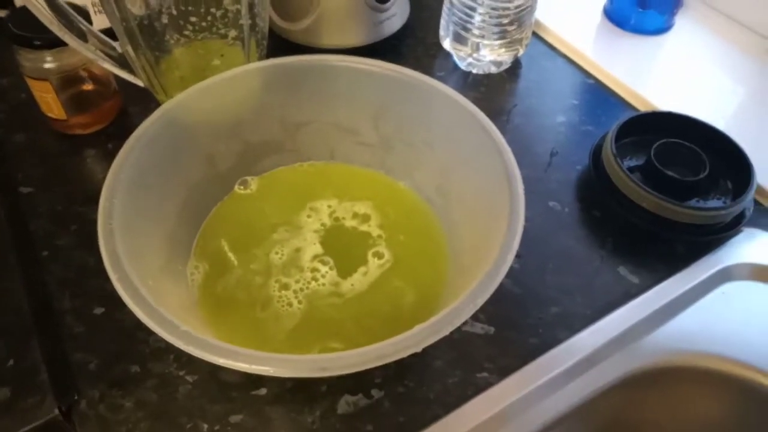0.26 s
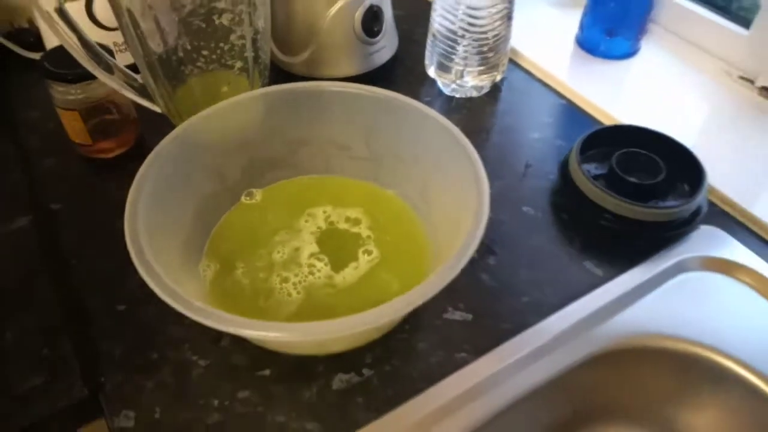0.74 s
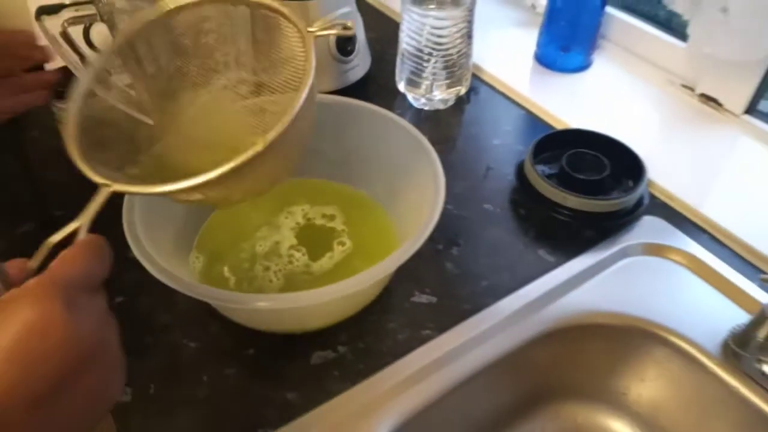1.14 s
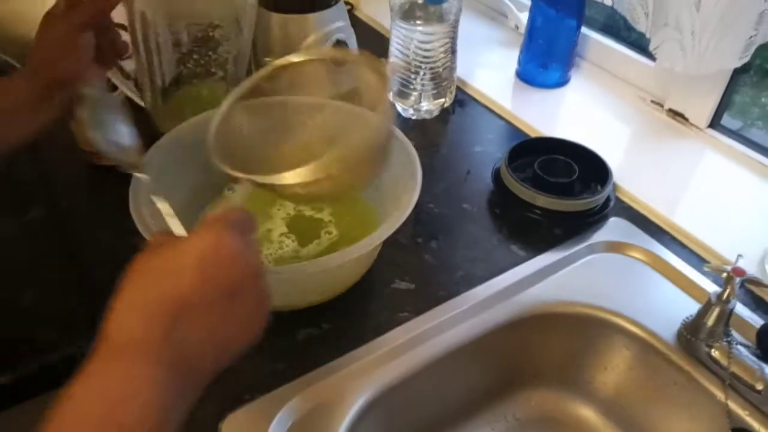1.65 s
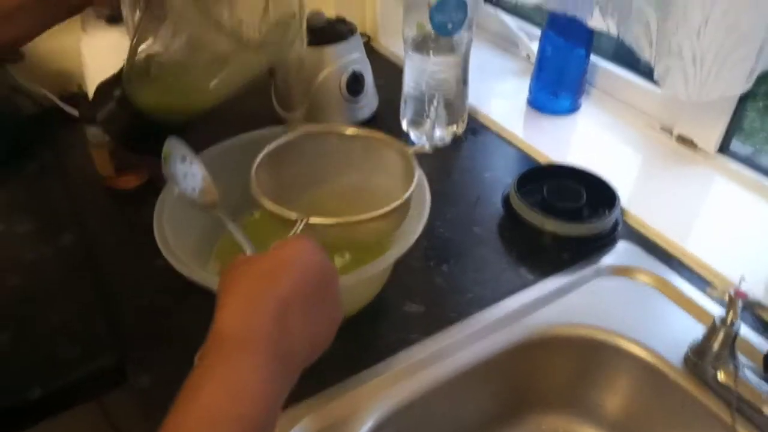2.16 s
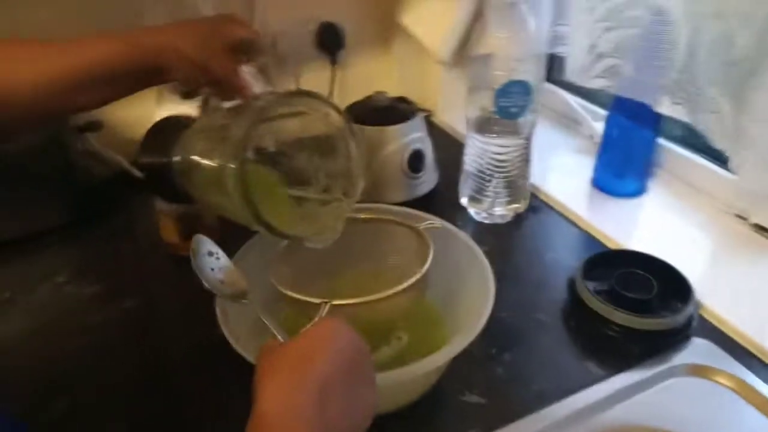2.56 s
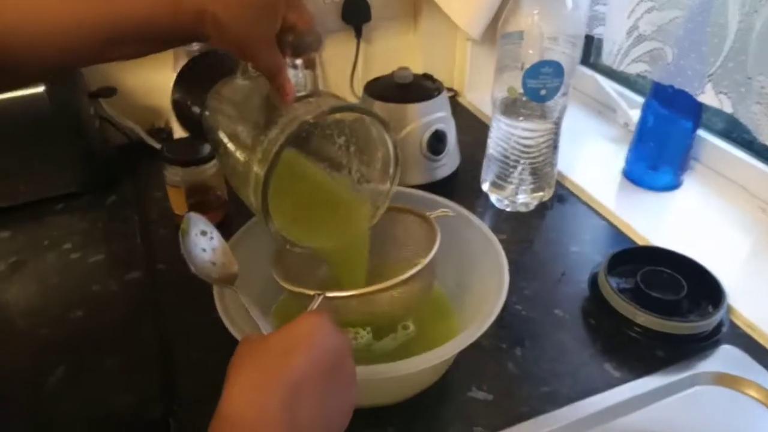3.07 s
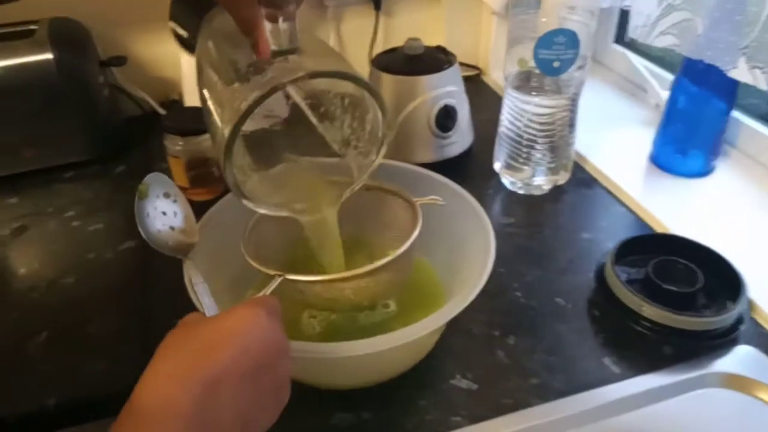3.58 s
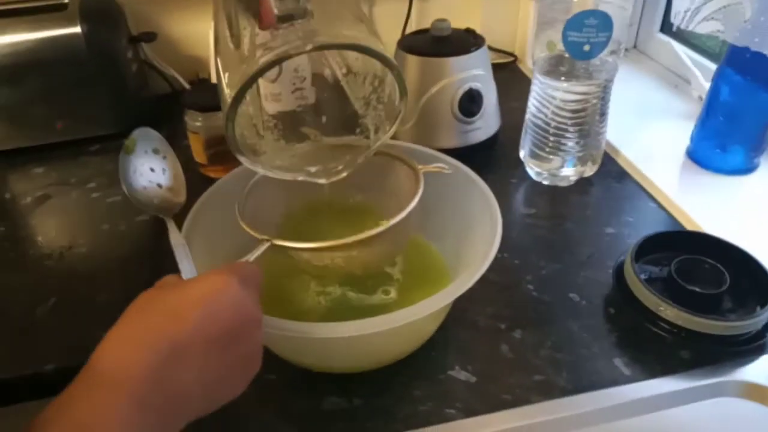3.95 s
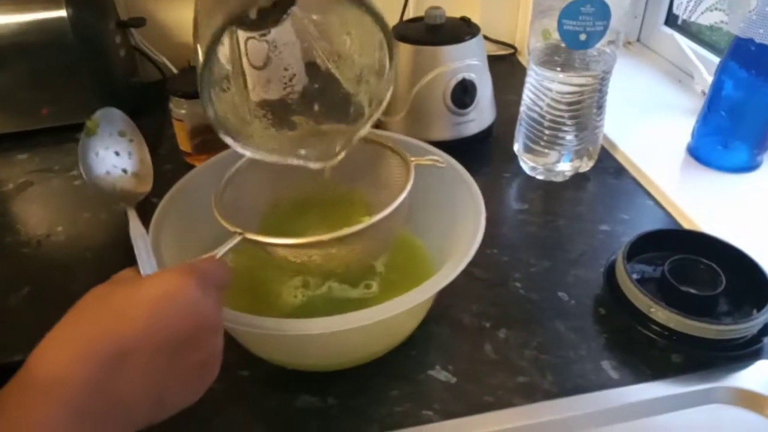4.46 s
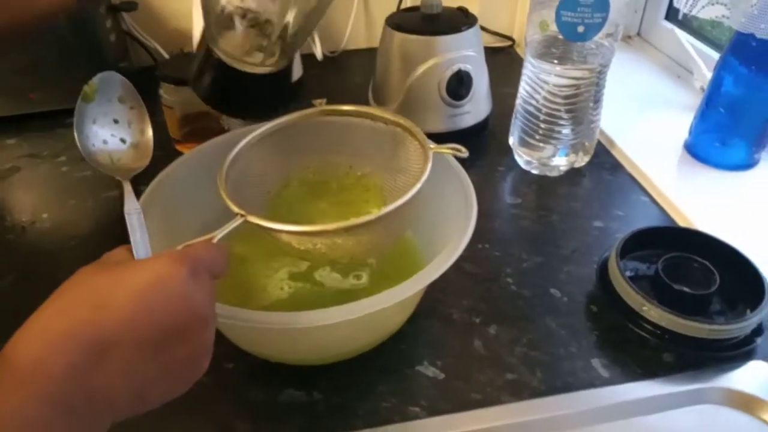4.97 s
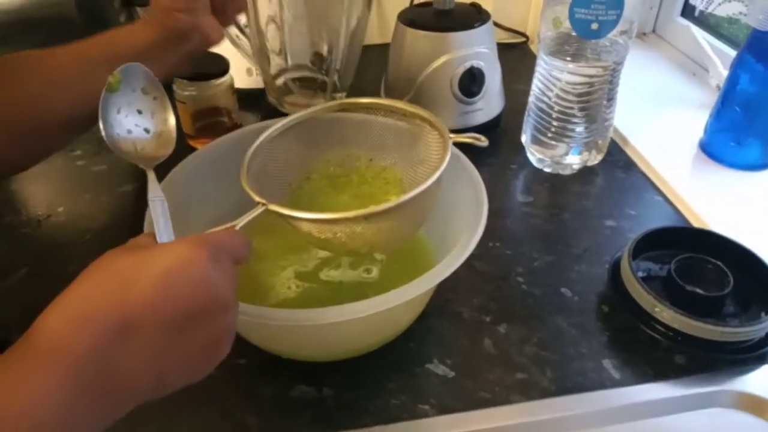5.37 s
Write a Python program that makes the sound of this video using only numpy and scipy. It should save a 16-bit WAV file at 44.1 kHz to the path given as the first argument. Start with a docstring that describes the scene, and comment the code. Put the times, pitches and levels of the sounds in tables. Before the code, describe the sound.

A faint, low fridge hum runs throughout in a small kitchen, with the action close by. At about 0.1 seconds a metal spoon and wire sieve are picked up with a bright tick and a brief wiry brush. More light taps and thin rubbing against a plastic bowl follow from 0.9 to 1.5 seconds. Around 1.6 seconds a blender jug judders briefly across the worktop, then rocks from 1.85 to 2.1 seconds with a quick run of ringing thuds, the loudest sounds here. It clinks once at 2.6 seconds as it is lifted. From about 3.2 to 3.8 seconds thick juice glugs into the sieve in surges, with bubbly plips, spattering droplets and tiny snaps of foam. The pour then thins to quiet, scattered drips through the mesh into the bowl until about 5 seconds, leaving little but the hum.

```python
"""Light taps and wiry brushing open the scene: a sieve and a spoon are picked up over a plastic bowl.
A blender jug judders across the worktop, rocks with ringing thuds and is lifted with a clink.
Thick juice glugs from it into the sieve, trapped air ringing as bubbles, droplets spattering and
foam snapping, then drips through the mesh into the bowl. A fridge hums throughout in the small kitchen."""
import sys
import numpy as np
from scipy import signal
from scipy.fft import rfft, irfft
from scipy.io import wavfile

SR = 44100
rng = np.random.default_rng(int(sys.argv[2]) if len(sys.argv) > 2 else 0)


def write(x):
    x = np.atleast_2d(x).T
    wavfile.write(sys.argv[1], SR, np.round(np.clip(x, -1, 1) * 32767).astype(np.int16))


N = 247842
TIME = np.arange(N) / SR

# the largest air pockets trapped by the pour and the drips: start_s, pitch_hz, level_db
LARGE_POCKETS = [(3.177, 1067, -50), (3.217, 2500, -50.5), (3.248, 1803, -50.5), (3.287, 2450, -48.5),
                 (3.306, 840, -59), (3.323, 6550, -30.5), (3.324, 2864, -38), (3.36, 2357, -34),
                 (3.374, 1804, -38.5), (3.397, 2980, -37), (3.43, 1458, -38), (3.431, 2120, -42),
                 (3.447, 3700, -38.5), (3.464, 1238, -43), (3.538, 3435, -39), (3.561, 1510, -40),
                 (3.567, 2056, -43.5), (3.619, 2042, -39), (3.71, 4870, -42.5), (3.734, 3244, -42.5),
                 (3.764, 2700, -49), (3.772, 956, -60), (4.058, 1642, -55.5), (4.083, 2447, -53),
                 (4.09, 5380, -55), (4.144, 4180, -53.5), (4.26, 3180, -53.5), (4.537, 5400, -55),
                 (4.614, 5850, -58), (4.669, 2070, -57.5), (4.671, 4140, -48), (4.8, 4530, -48),
                 (4.8, 2910, -58), (4.828, 4480, -50), (4.851, 3450, -49.5), (4.883, 4450, -49),
                 (4.955, 4110, -45.5), (4.993, 5570, -52)]
POUR_START_S, BUBBLE_MID_HZ = LARGE_POCKETS[0][0], 2500
FULL_FLOW_DB, RATE_FOLLOWS = -54, 0.35   # event rates follow this share of the flow's swing in dB


def from_db(db):
    """Decibels to gain."""
    return 10 ** (np.asarray(db) / 20)


def rms_one(x):
    """Scale to rms 1."""
    return x / np.sqrt(np.mean(x ** 2) + 1e-20)


def at_hz(points, hz):
    """Read a curve on a log-frequency axis."""
    freqs, values = np.transpose(points)
    return np.interp(np.log(np.maximum(hz, 1)), np.log(freqs), values)


def coloured(x, curve):
    """Equalise with a smooth curve of freq_hz, gain_db."""
    gain = from_db(at_hz(curve, np.fft.rfftfreq(len(x), 1 / SR)))
    return irfft(rfft(x) * gain, len(x))


def high_pass(x, hz, order=4):
    """Roll off the lows below hz."""
    return signal.sosfilt(signal.butter(order, hz, "high", fs=SR, output="sos"), x)


def drift(per_s):
    """A random wander, gliding between normal draws."""
    knots = rng.standard_normal(int(TIME[-1] * per_s) + 2)
    return np.interp(TIME * per_s, np.arange(len(knots)), knots)


def dying(t, t60):
    """Exponential decay, 60 dB down at t60."""
    return np.exp(-np.log(1000) * t / t60)


def swell(crest_s, db, rise_s, fall_s):
    """A gain that climbs to db and fades again, by 60 dB in rise_s and in fall_s."""
    before, after = np.maximum(crest_s - TIME, 0), np.maximum(TIME - crest_s, 0)
    return from_db(db) * dying(before, rise_s) * dying(after, fall_s)


def add(out, s, sound):
    """Mix a sound in at time s."""
    i = min(int(s * SR), N)
    out[i:i + len(sound)] += sound[:N - i]


def click_track(hits):
    """One impulse for each start_s, level_db."""
    clicks = np.zeros(N)
    for s, db in hits:
        add(clicks, s, from_db([db]))
    return clicks


def ring(clicks, hz, t60):
    """Each click sets a damped sine ringing."""
    r, w = dying(1 / SR, t60), 2 * np.pi * hz / SR
    return signal.lfilter([0, np.sin(w)], [1, -2 * r * np.cos(w), r * r], clicks + 1e-18)


def strike(hits, modes):
    """Hits ring a body's modes, in alternating polarity."""
    clicks = click_track(hits)
    return sum((-1) ** k * from_db(db) * ring(clicks, hz, t60) for k, (hz, db, t60) in enumerate(modes))


def band(x, hz, width_hz):
    """One resonant band-pass."""
    return signal.lfilter(*signal.iirpeak(hz, hz / width_hz, fs=SR), x)


def resonate(x, modes):
    """Drive parallel resonances in alternating polarity; rms 1."""
    return rms_one(sum((-1) ** k * from_db(db) * band(x, hz, width)
                       for k, (hz, width, db) in enumerate(modes)))


def friction(grains_per_s):
    """A dense train of small slips of uneven size."""
    return rms_one(rng.standard_normal(N) * (rng.random(N) < grains_per_s / SR))


def impact(levels_db, rise_s, t60):
    """A contact shakes many damped modes at once: a noise burst with a level per octave in four bands."""
    # bass, middle, presence and treble: centre_hz
    centres = (180, 800, 2600, 6000)
    t = TIME[:SR // 4]
    colour = [(hz, db + 10 * np.log10(SR / 2 / hz)) for hz, db in zip(centres, levels_db)]
    return coloured(rng.standard_normal(len(t)), colour) * dying(t, t60) * (1 - dying(t, rise_s))


def fridge(rush_db=-68.5, waver_db=3.5, wander_rad=0.5):
    """A low rush with motor tones that waver a little, and a thin whine."""
    # colour of the rush: freq_hz, gain_db
    rush_colour = [(25, -14.5), (50, -7), (100, -4.5), (150, -5.5), (200, 5), (260, -1.5), (320, 3.5),
                   (420, -9.5), (600, -16), (1200, -23), (3000, -23.5), (6000, -27), (9000, -22.5),
                   (15000, -16)]
    # motor tones and whine: pitch_hz, rms_db
    tones = [(146, -79), (199, -82), (342, -68), (441, -91.5), (1615, -97.5), (3569, -90.5), (3715, -87)]
    hum = 0
    for hz, db in tones:
        peak = np.sqrt(2) * from_db(db + waver_db * drift(11))
        hum = hum + peak * np.sin(2 * np.pi * hz * TIME + wander_rad * drift(17))
    return hum + from_db(rush_db) * rms_one(coloured(rng.standard_normal(N), rush_colour))


def kitchen(send, predelay_s=0.0044):
    """Diffuse echoes off worktop and walls, dying faster in the treble."""
    # reverb time of the room: freq_hz, t60_s
    decay_times = [(150, 0.41), (600, 0.28), (2500, 0.27), (6000, .3), (12000, 0.16)]
    t = TIME[:SR // 2]
    white, hz = rfft(rng.standard_normal(len(t))), np.fft.rfftfreq(len(t), 1 / SR)
    edges_hz, tail = np.geomspace(40, 20480, 10), 0
    for low, high in zip(edges_hz, edges_hz[1:]):
        octave = irfft(white * ((hz >= low) & (hz < high)), len(t))
        tail = tail + octave * dying(t, at_hz(decay_times, np.sqrt(low * high)))
    tail = tail * (t > predelay_s)
    return signal.fftconvolve(send, tail / np.linalg.norm(tail))[:N]


def spoon_note():
    """A jolt leaves the spoon ringing faintly on one long, thin note."""
    # jolts to the spoon: start_s, level_db
    jolts = [(0.142, -77.5), (1.899, -72)]
    return ring(click_track(jolts), hz=3165, t60=2.3)


def metal_song(spread=0.46, partial_width_hz=45, swell_db=3.0, count=4):
    """Rubbed metal sings in clusters of close partials that swell and fade as the contact point moves."""
    # resonances of wire rim and spoon: pitch_hz, width_hz, level_db
    modes = [(2159, 190, 5.5), (3165, 17, 1.5), (3540, 20, 5), (3795, 220, 2.5), (4460, 287, 0.5),
             (5320, 214, -1), (6050, 240, 3.5), (6870, 410, -8)]
    slips, out = friction(grains_per_s=5000), 0
    for hz, width, db in modes:
        offsets = np.linspace(-1, 1, count) + rng.uniform(-0.28, 0.25, count)
        partials = [(hz + spread * width * off, min(partial_width_hz, width / 2), 0) for off in offsets]
        out = out + from_db(db + swell_db * drift(8.3)) * np.sqrt(width) * resonate(slips, partials)
    return rms_one(out)


def brushing(flutter_db=2.5, sizzle_hz=15200, sizzle_width_hz=1700, sizzle_length=0.55, rub_top_hz=8500):
    """Sieve and spoon slide in fine-grained strokes; the mesh sizzles and the metal sings faintly."""
    # handling strokes: crest_s, rub_db, metal_db, sizzle_db, rise_s, fall_s
    strokes = [(0.03, -70, -81, -100, -4, 3.5), (0.145, -48, -64, -36.5, 0.19, 0.34),
               (0.41, -65, -76, -90, 3, 0.57), (0.85, -67, -68, -64, 0.65, 1.8),
               (0.965, -54, -83, -74, 0.61, 0.33), (1.135, -51, -52, -43, 0.01, 0.12),
               (1.249, -51, -61, -38.5, 0.24, 0.39), (1.305, -49.5, -59, -41.5, 0.4, .36),
               (1.49, -65, -76, -92, 2.5, 0.8), (1.645, -45, -82, -44, 0.2, 0.19),
               (2.12, -64.5, -64.5, -98, 1.44, 1.28)]
    # colour of the rubbing: freq_hz, gain_db
    rub_colour = [(300, -15), (1000, -1.5), (1600, -2.5), (2300, -1), (3200, -1.5), (4400, 0.5), (5200, 5),
                  (6300, 4.5), (9000, -8.5), (15000, 2)]
    rub_gain = metal_gain = sizzle_gain = 0
    for s, rub_db, metal_db, sizzle_db, rise_s, fall_s in strokes:
        rub_gain = np.hypot(rub_gain, swell(s, rub_db, rise_s, fall_s))
        metal_gain = np.hypot(metal_gain, swell(s, metal_db, rise_s, fall_s))
        firm_contact = swell(s, sizzle_db, sizzle_length * rise_s, sizzle_length * fall_s)
        sizzle_gain = np.hypot(sizzle_gain, firm_contact)
    sizzle = high_pass(resonate(friction(grains_per_s=2200), [(sizzle_hz, sizzle_width_hz, 0)]), 8000)
    rub = rms_one(coloured(friction(grains_per_s=6000), rub_colour))
    rub = signal.sosfilt(signal.butter(3, rub_top_hz, fs=SR, output="sos"), rub)
    flutter = from_db(flutter_db * drift(40))
    return (rub * rub_gain + sizzle * sizzle_gain) * flutter + metal_song() * metal_gain


def taps(trim_db=1, ring_t60=0.046):
    """Utensils and bowl touch lightly, each tap a short burst with one main resonance."""
    # light contacts: start_s, bass_db, middle_db, presence_db, treble_db, rise_s, t60_s, ring_hz, ring_db
    contacts = [(0.130, -80, -94, -54, -46.5, 0.019, 0.18, 2560, -66),
                (0.142, -64, -70, -36.5, -46, 0.0033, 0.031, 2840, -43),
                (0.31, -66, -71, -91, -81, 0.032, 0.22, 585, -68.5),
                (0.795, -85, -93, -80, -68, .02, 0.11, 2010, -68),
                (0.952, -81, -55.5, -65, -51, 0.0082, 0.08, 930, -80),
                (1.109, -68.5, -52, -58.5, -55.5, .012, 0.31, 1164, -41.5),
                (1.239, -104, -59.5, -51, -47, 0.0065, 0.17, 3730, -60),
                (1.532, -62, -45, -63, -67, 0.0098, 0.099, 129, -36),
                (2.596, -99, -55, -56.5, -35, 0.006, 0.056, 1082, -47),
                (2.889, -88.5, -88.5, -84, -70, .003, .03, 4600, -71)]
    out, t = np.zeros(N), TIME[:SR // 4]
    for s, *levels_db, rise_s, t60, hz, ring_db in contacts:
        ping = from_db(ring_db) * np.sin(2 * np.pi * hz * t) * dying(t, ring_t60)
        add(out, s, impact(levels_db, rise_s, t60) + ping)
    return from_db(trim_db) * high_pass(out, 70, order=2)


def jug_drag():
    """The jug's foot sticks and slips, driving its resonances."""
    # envelope of the drag: time_s, level_db
    envelope = [(1.28, -81.5), (1.45, -69.5), (1.585, -67.5), (1.632, -45.5), (1.675, -39.5), (1.692, -66),
                (1.72, -84.5)]
    # resonances of the sliding jug: pitch_hz, width_hz, level_db
    modes = [(227, 86, 1), (590, 50, 2), (860, 93, -2), (1780, 13, 7), (2195, 80, -5.5), (2666, 25, -12),
             (3350, 60, -20.5), (4450, 95, -11.5), (5570, 80, -7.5), (6230, 200, -7.5)]
    times, levels_db = np.transpose(envelope)
    sliding = (TIME > times[0]) & (TIME < times[-1])
    gain = from_db(np.interp(TIME, times, levels_db)) * sliding
    return resonate(friction(grains_per_s=2000), modes) * gain


def worktop(thuds):
    """The worktop booms low down and is hollow just above."""
    # boom and dip: centre_hz, width_hz, added_gain (negative cuts)
    bands = [(160, 22, 0.45), (385, 160, -.5)]
    return thuds + sum(gain * band(thuds, hz, width) for hz, width, gain in bands)


def jug_knocks(thud_trim_db=-1, fade_from_s=2.026, fade_t60=0.34):
    """The rocking jug thuds and rings at each landing; the ring dies away quickly after the last knock."""
    # landings of the foot: start_s, bass_db, middle_db, presence_db, treble_db, ring_db
    landings = [(1.858, -40, -47.5, -39, -28.5, -32.5), (1.863, -40, -28.5, -41.5, -40.5, -34),
                (1.899, -20.5, -21.5, -42.5, -53.5, -26.5), (1.955, -26, -22, -43.5, -52.5, -25.5),
                (2.027, -31, -28, -72.5, -77, -42.5)]
    # modes of jug and worktop, ahead of the fade: pitch_hz, level_db, t60_s
    modes = [(149.6, -4, 0.14), (192.5, -8, 0.23), (269.8, -9, 0.6), (315, -13.5, 0.13),
             (364, -14.5, 0.303), (465, -14, 0.26), (477, -2.5, 0.095), (540.1, 3.5, 0.25),
             (625.6, 2.5, 0.13), (632, -8, 0.27), (713, -7.5, 0.45), (745.3, -8, 0.33), (892, -13.5, .22),
             (1070, -22.5, 0.12), (1417, -20.5, 0.13)]
    thuds = np.zeros(N)
    for s, *levels_db, _ in landings:
        add(thuds, s, impact(levels_db, rise_s=0.004, t60=0.057))
    thuds = from_db(thud_trim_db) * high_pass(worktop(thuds), 140)
    rings = strike([(s, ring_db) for s, *_, ring_db in landings], modes)
    fade = dying(np.maximum(TIME - fade_from_s, 0), fade_t60)
    return thuds, high_pass(rings * fade, 83, order=2)


def jug_clinks():
    """A hard touch sets the jug's wall ringing."""
    # hard touches: start_s, level_db
    touches = [(1.859, -54), (2.596, -54.5)]
    # upper modes of the jug: pitch_hz, level_db, t60_s
    modes = [(930, -0.5, 0.17), (1082, -1, 0.15), (1400, -2.5, 0.13), (2700, -3, 0.08), (2890, -5.5, 0.16),
             (4860, -5, 0.23), (5840, 1, 0.27), (6570, -4, 0.28), (6500, 1, 0.17)]
    return strike(touches, modes)


def bowl(x, echo_db=-4, t60=0.017):
    """Sound bounces for a few milliseconds between the walls of bowl and jug."""
    t = TIME[:SR // 20]
    echoes = rng.standard_normal(len(t)) * dying(t, t60) * (t > 0.001)
    return x + from_db(echo_db) * signal.fftconvolve(x, echoes / np.linalg.norm(echoes))[:N]


def juice_flow(drain_s=3.7, drain_db=-67, seep_db=-82):
    """Flow on the mesh in dB: thick juice lands in surges, the sieve drains and the pulp seeps on."""
    # surges from the jug: crest_s, level_db
    surges = [(3.246, -57), (3.344, -52), (3.454, -53), (3.583, -46.5), (3.655, -55.5), (3.774, -58)]
    pour_power = sum(swell(s, db, rise_s=0.27, fall_s=0.24) ** 2 for s, db in surges)
    trickle = swell(drain_s, drain_db, rise_s=1.0, fall_s=2.6) + from_db(seep_db) * (TIME > drain_s)
    return 10 * np.log10(pour_power + trickle ** 2 + 1e-20)


def flow_events(flow_db, per_s, gate_db, slots=400):
    """Random events, denser in strong flow: start_s, weak_db (0 at full flow or more), normal draw."""
    place, chance = rng.random(slots), rng.random(slots)
    draw = np.clip(rng.standard_normal(slots), -2, 2)
    slot_s = (TIME[-1] - POUR_START_S) / slots
    starts = POUR_START_S + slot_s * (np.arange(slots) + place)
    level_db = np.interp(starts, TIME, flow_db)
    relative_db = level_db - FULL_FLOW_DB
    happens = (chance < per_s * slot_s * from_db(RATE_FOLLOWS * relative_db)) & (level_db > gate_db)
    return np.column_stack([starts, np.minimum(relative_db, 0), draw])[happens]


def foam_snaps(flow_db, trim_db=8, pocket_offset_db=-15, faint_db=-52, follows=0.45, uneven_db=3):
    """Tearing films crack, tiny and bright: a few loud, one per large pocket, and a faint scatter."""
    # the loudest films of foam to snap: start_s, level_db
    loud = [(3.325, -38), (3.446, -37), (3.568, -36.5), (3.654, -40), (3.691, -42), (3.746, -35.5),
            (3.768, -45), (3.816, -44)]
    of_pockets = [(s, db + pocket_offset_db) for s, _, db in LARGE_POCKETS]
    faint = [(s, faint_db + follows * weak_db + uneven_db * draw)
             for s, weak_db, draw in flow_events(flow_db, per_s=24, gate_db=-85)]
    out, t = np.zeros(N), TIME[:SR // 20]
    for s, db in loud + of_pockets + faint:
        add(out, s, from_db(db + trim_db) * rng.standard_normal(len(t)) * dying(t, t60=0.016))
    return high_pass(out, 11000, order=3)


def spatter(flow_db, full_flow_per_s=2500, size_db=3.0, ring_cycles=45, dulling=0.33, pitch_count=32):
    """Droplets burst on the mesh, each with a brief ring; a weak trickle is sparser and duller."""
    # droplet strength by pitch: pitch_hz, level_db
    colour = [(900, -46), (1500, -8), (2200, -5), (3300, -6), (4500, -2.5), (6000, 8.5), (8000, -4.5),
              (15000, 11.5)]
    per_s = full_flow_per_s * from_db(RATE_FOLLOWS * (flow_db - FULL_FLOW_DB))
    sizes = from_db(size_db * np.minimum(rng.exponential(1, N), 3)) * rng.choice([-1, 1], N)
    drops = rms_one(sizes) * (rng.random(N) < per_s / SR) * np.sqrt(SR / np.maximum(per_s, 1))
    drops = drops * from_db(flow_db) * (TIME > POUR_START_S)
    tilt_db_per_octave = dulling * np.minimum(flow_db - FULL_FLOW_DB, 0)
    pitch_index, rings = rng.integers(0, pitch_count, N), 0
    for k, hz in enumerate(np.geomspace(1000, 15000, pitch_count)):
        gain = from_db(at_hz(colour, hz) + tilt_db_per_octave * max(np.log2(hz / 2000), 0))
        rings = rings + np.sqrt(hz) * ring(gain * drops * (pitch_index == k), hz, ring_cycles / hz)
    return rms_one(high_pass(rings, 1000)) * np.std(drops)


def air_pockets(flow_db, lesser_db=-52, follows=0.73, spread_octaves=0.605):
    """The juice traps large pockets of air and a scatter of lesser ones: start_s, pitch_hz, level_db."""
    lesser = [(s, BUBBLE_MID_HZ * 2 ** (spread_octaves * draw), lesser_db + follows * weak_db)
              for s, weak_db, draw in flow_events(flow_db, per_s=100, gate_db=-66.5)]
    return LARGE_POCKETS + lesser


def froth(pockets, trim_db=-13, spread=0.0986, linger_s=0.009, ring_cycles=55, count=14):
    """Each pocket also breaks into a quick cluster of bubbles of nearly its size: a wet plip."""
    out, t = np.zeros(N), TIME[:SR // 16]
    for s, hz, db in pockets:
        pitches = hz * np.exp(spread * np.clip(rng.standard_normal(count), -2, 2))
        lags = np.minimum(rng.exponential(1, count), 3)
        for pitch, lag in zip(pitches, lags):
            attack = 1 - dying(t * pitch, 7.5)   # opens over 7.5 cycles
            plip = np.sin(2 * np.pi * pitch * t) * dying(t, ring_cycles / pitch) * attack
            add(out, s + linger_s * lag, from_db(db + trim_db - 2 * lag) * plip)
    return out


def bubbles(pockets, mid_t60=0.052, shortening=0.14, glide=0.13, attack_s=0.00045, rolloff_hz=2600):
    """Each air pocket rings as a damped sine, rising as it nears the surface; small ones ring less."""
    out, t = np.zeros(N), TIME[:SR // 6]
    attack = 1 - np.exp(-t / attack_s)
    for s, hz, db in pockets:
        t60 = mid_t60 * (BUBBLE_MID_HZ / hz) ** shortening
        pitch = hz * (1 + glide * np.minimum(t / t60, 1))
        gain = from_db(db - 0.05) / np.hypot(1, (hz / rolloff_hz) ** 2)
        add(out, s, gain * np.sin(2 * np.pi * np.cumsum(pitch) / SR) * dying(t, t60) * attack)
    return out


def scene():
    """Handling, jug and juice over the fridge, each with its own send to the room."""
    handling = taps() + from_db(-2.5) * brushing() + from_db(-1) * jug_drag()
    thuds, rings = jug_knocks()
    flow_db = juice_flow()
    pockets = air_pockets(flow_db)
    juice = bubbles(pockets) + bowl(froth(pockets) + from_db(-1) * spatter(flow_db))
    direct = handling + spoon_note() + thuds + rings + jug_clinks() + juice + foam_snaps(flow_db)
    send = from_db(-7) * handling + from_db(-3.5) * thuds + from_db(-23) * rings + from_db(-6.5) * juice
    return (direct + kitchen(send) + fridge())[None]


def record(dry, cutoff_hz=15900):
    """A small microphone, dull above 7 kHz, with a steep cut at the very top."""
    # microphone response: freq_hz, gain_db
    microphone = [(6400, 1), (7200, -6.5), (8200, -14.5), (11000, -17.5), (13600, -21.5), (15000, -11),
                  (16000, -14.5)]
    top_cut = signal.ellip(10, 0.1, 70, cutoff_hz, fs=SR, output="sos")
    return signal.sosfilt(top_cut, coloured(dry[0], microphone))[None]


dry = scene()
out = record(dry)
write(out)
```